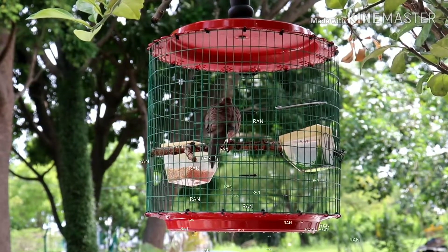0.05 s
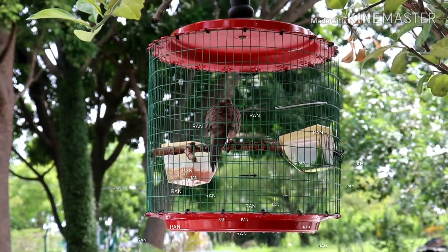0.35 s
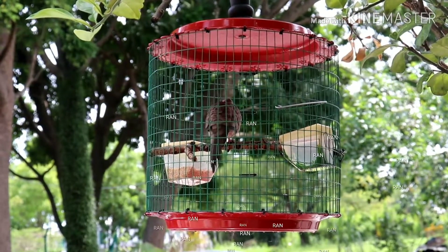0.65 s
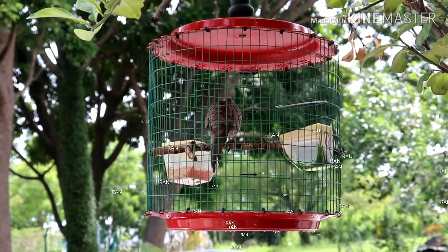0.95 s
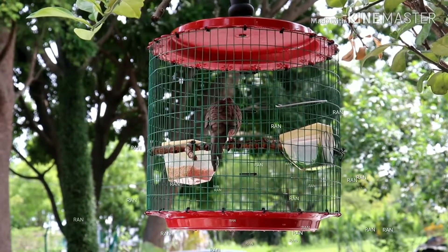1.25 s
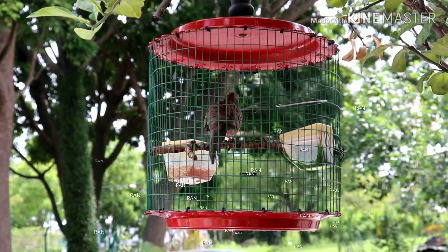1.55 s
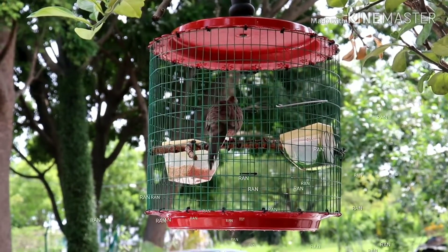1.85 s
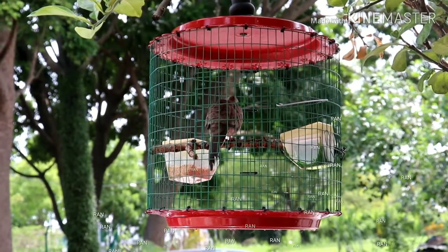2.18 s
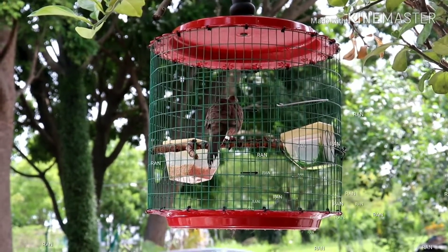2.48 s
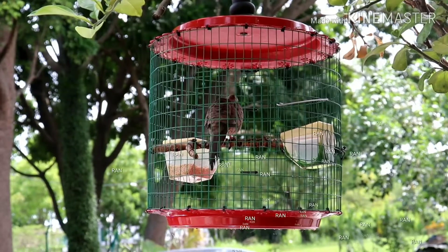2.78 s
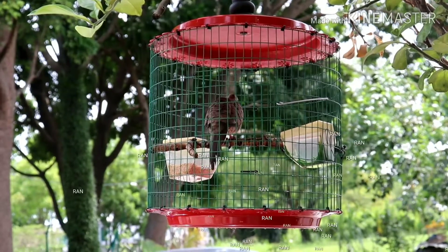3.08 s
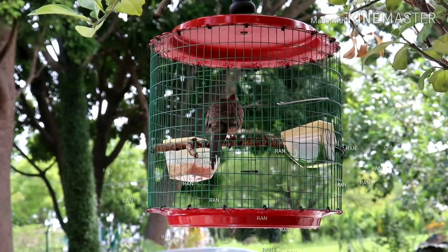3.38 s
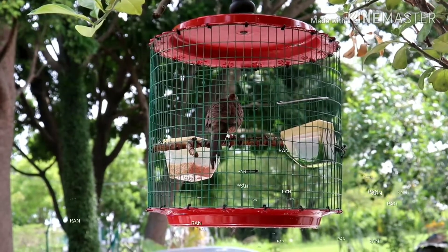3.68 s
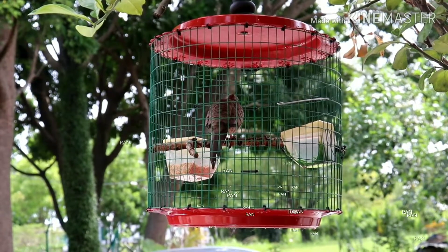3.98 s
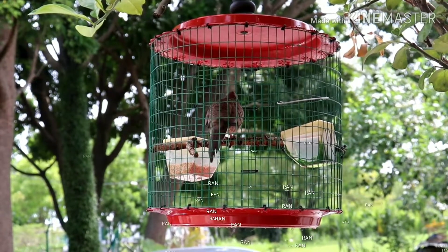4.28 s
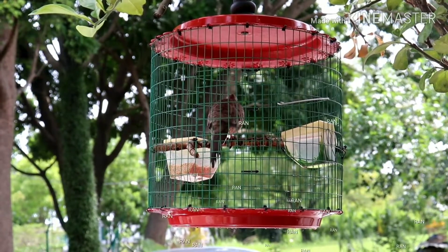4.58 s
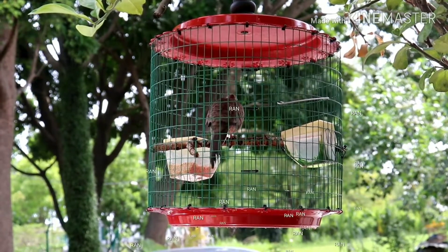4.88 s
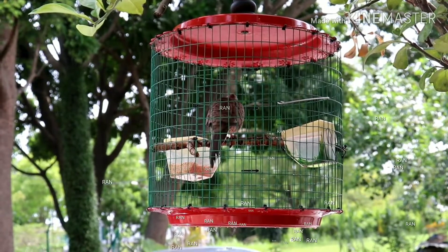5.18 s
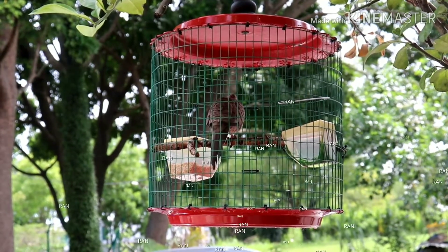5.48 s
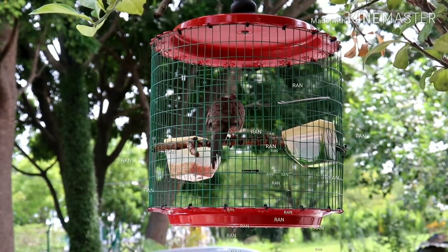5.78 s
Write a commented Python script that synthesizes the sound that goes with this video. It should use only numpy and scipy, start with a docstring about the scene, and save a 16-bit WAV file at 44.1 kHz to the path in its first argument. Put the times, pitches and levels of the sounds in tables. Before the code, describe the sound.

Outdoors among trees, a nearby dove gives a short whoop and three soft, pure coos, repeats the phrase right away, then once more after a pause. Behind it, other birds tweet, whistle, scold and yelp faintly from different sides with a light echo. Something like a broom swishes quietly through leaves throughout, and a low rumble with a faint motor hum lies underneath.

```python
"""A small dove coos three phrases in a hanging cage in a garden. Each is a whoop and three coos:
nearly pure tones whose overtones the throat weakens, interfering with echoes from nearby surfaces.
Farther off, other birds yelp, tweet, scold and whistle in gliding tones scattered by the trees.
Something like a broom swishes through leaves about twice a second over a low, distant rumble."""
import sys
import numpy as np
from scipy import signal
from scipy.fft import rfft, irfft
from scipy.io import wavfile
from scipy.ndimage import uniform_filter1d

SR = 44100
rng = np.random.default_rng(int(sys.argv[2]) if len(sys.argv) > 2 else 0)


def master_out(mix):
    """Clip the mix to full scale and print it as 16-bit PCM to the path in sys.argv[1]."""
    frames = np.transpose(np.atleast_2d(mix))
    ceiling = np.clip(frames, -1, 1)
    pcm = np.round(ceiling * 32767).astype(np.int16)
    wavfile.write(sys.argv[1], SR, pcm)


N = 266805
SLACK_HZ = 715  # the dove's voice scoops up from this pitch


def dove(rasp_db=-47, wet_db=-22):
    """Multipath interference: delayed reflections of each gliding note beat against the direct sound."""
    # opening whoops: (time [s], low part [s], high part [s], high pitch [Hz], pause before flick [s],
    # rise of flick [Hz], level [dB])
    whoops = [(.0605, 0.065, 0.091, 1077, -.003, 51.3, -9), (1.6931, 0.061, .098, 1039, 0.0085, 266, -9),
              (4.4256, .039, .122, 1026, -.003, 258, -8)]
    # three coos a phrase, falling in pitch: (time [s], length [s], pitch [Hz], level [dB])
    coos = [(0.298, 0.04, 974, -11), (0.4102, 0.062, 898, -11), (0.559, 0.13, 869, -12),
            (1.96, 0.041, 951, -9), (2.0716, 0.15, 863.6, -11.5), (2.3267, 0.13, 840.7, -12),
            (4.6682, .0383, 967, -9), (4.778, 0.092, 868.7, -9.5), (4.9603, 0.13, 847.4, -10.5)]
    # direct path, then the nearest surfaces, at each ear: (delay [s], gain [ratio])
    paths_left = [(4e-05, .923), (.00641, .1), (.00891, .17), (.01122, .26), (.03462, .15), (.04279, .14)]
    paths_right = [(0, 1.055), (.01118, .2), (.02378, .115), (.03127, .09), (.03825, .11), (.04646, .15)]
    # reflections from trunks and the line of trees: (delay [s], level [dB])
    far_echoes = [(.068, -28.5), (.115, -26), (.175, -33)]
    voice, overtones = np.zeros(N), np.zeros(N)
    for call in [whoop(*row) for row in whoops] + [coo(*row) for row in coos]:
        for s, parts in call:
            for layer, part in zip((voice, overtones), parts):
                add(layer, s, part)
    overtones *= amp(3.03 * wander(30))
    rasp = amp(rasp_db) * voice * wander(2500)
    voice += overtones + rasp
    ears = np.zeros((2, N))
    for ear, paths in zip(ears, (paths_left, paths_right)):
        for delay, gain in paths:
            add(ear, delay, gain * voice)
        for delay, db in far_echoes:
            add(ear, delay, amp(db) * voice)
    return ears + amp(wet_db) * garden(voice)


def whoop(s, low_s, high_s, high_hz, pause_s, rise_hz, db, low_hz=891.3, overlap_s=0.0056):
    """Register break: a low note leaps to a high, falling one, and an upward flick follows."""
    onset = squeak(s + .003, length=.031, db=-17.5)
    low = note(low_s + overlap_s, low_hz, db - 1.9, attack=0.034, release=0.0077, scoop=low_hz - SLACK_HZ)
    high = note(high_s, high_hz, db, attack=0.0035, release=0.013,
                glide=-108, scoop=86, buzz_db=-4.5, hollow_db=-2.5)
    flick = note(.04, low_hz, db + 1, attack=0.03, release=0.015, glide=rise_hz, hollow_db=-4.5)
    return [onset, (s, low), (s + low_s, high), (s + low_s + high_s + pause_s, flick)]


def coo(s, length, pitch, db, end_hz=758.5):
    """Pitch glide: a nearly pure note scoops up from the slack pitch and sags at the end."""
    onset = squeak(s, length=.018, db=-22)
    tone = note(length, pitch, db, attack=0.021, release=min(0.037, 0.36 * length),
                scoop=pitch - SLACK_HZ, sag=pitch - end_hz)
    return [onset, (s, tone)]


def note(length, pitch, db, attack, release, glide=0, scoop=0, sag=0, buzz_db=3, hollow_db=-1):
    """Source and filter: a buzz turns hollow as the throat fills. Rows: fundamental, overtones."""
    # what the throat passes of the overtones: (frequency [Hz], relative level [dB])
    throat = [(1450, -29), (1700, -43.5), (2100, -34), (2550, -44), (3100, -44), (3450, -47), (4200, -57.5),
              (5100, -53.5), (5600, -52.5), (6050, -42), (6400, -56), (8000, -68)]
    bend_s, buzz_attack_s, buzz_decay_s = .012, 0.0039, 0.03
    tremble_hz, husk_db = 3.9, 2
    t = clock(length)
    bend = scoop * np.exp(-t / bend_s) + sag * np.exp((t - length) / bend_s)
    hz = pitch + glide * (t / length - .5) - bend + tremble_hz * tremble(len(t))
    phase = 2 * np.pi * np.cumsum(hz) / SR
    fill = np.sin(np.pi / 2 * np.minimum(t / attack, 1))
    fade = amp(db) * np.sin(np.pi / 2 * np.minimum((length - t) / release, 1))
    buzz = np.minimum(t / buzz_attack_s, 1) * amp(hollow_db + buzz_db * np.exp(-t / buzz_decay_s))
    overtones = sum(amp(read(throat, k * hz) + husk_db * tremble(len(t))) * np.sin(k * phase)
                    for k in range(2, 9))
    return fade * np.array([fill * np.sin(phase), buzz * overtones])


def squeak(note_s, length, db, from_hz=830, to_hz=1160, rough_hz=90, overlap_s=.004):
    """Onset transient: a rough rising tone swells into the note as the throat opens."""
    count = len(clock(length))
    hz = np.geomspace(from_hz, to_hz, count) + rough_hz * tremble(count)
    tone = whistle(hz, db, fade=0.58) * np.linspace(0, 1, count)
    return note_s + overlap_s - length, [tone]


def tremble(count):
    """Jitter and shimmer: the throat's quick unsteadiness, as smoothed noise of rms near 1."""
    return evened(uniform_filter1d(rng.standard_normal(SR // 2), size=90))[:count]


def yelper(level_db=-39, fade_db_per_s=1.9, hz_per_db=90, echo_s=.032, echo_db=-10):
    """Coupled pitch and level: flat-topped arches, weaker at their low ends, each with a slap echo."""
    # a distant bird's yelps: (time [s], length [s], top pitch [Hz])
    yelps = [(2.763, 0.13, 1373), (2.883, 0.077, 1298), (2.952, 0.042, 1314), (3.023, 0.07, 1290),
             (3.123, 0.053, 1386), (3.229, 0.089, 1385), (3.409, 0.09, 1377), (3.615, 0.12, 1350),
             (3.832, 0.12, 1349), (4.064, .12, 1352), (4.304, .09, 1360), (4.774, 0.11, 1377),
             (4.902, 0.07, 1290), (4.984, 0.064, 1376), (5.105, 0.094, 1350), (5.295, 0.11, 1315)]
    scoop_hz, scoop_s, drop_hz, drop_s = 420, 0.01068, 250, 0.0126
    out = np.zeros(N)
    for s, length, top_hz in yelps:
        t = clock(length)
        below_hz = scoop_hz * np.exp(-t / scoop_s) + drop_hz * np.exp((t - length) / drop_s)
        db = level_db - fade_db_per_s * (s - yelps[0][0]) - below_hz / hz_per_db
        yelp = whistle(top_hz - below_hz, db, fade=0.091)
        add(out, s, yelp)
        add(out, s + echo_s, amp(echo_db) * yelp)
    return placed(out * amp(2.9 * wander(54)), lag_ms=0.088, pan_db=2, wet_db=-8.5)


def tweeter(low_hz=2500, level_db=-44, hollow_db=9, lean_db=4):
    """Frequency sweeps: each tweet is two quick arches of pitch, both weak at the top."""
    # a small bird's tweets: (time [s])
    tweets = [0.378, 0.62, 0.897, 1.18, 1.437, 1.751, 2.095, 2.491, 2.815, 3.314, 3.605, 3.874, 4.182]
    # the syllables of a tweet: (delay [s], length [s], mean arch height [Hz])
    syllables = [(.002, 0.02585, 404.6), (.035, 0.0309, 443)]
    out = np.zeros(N)
    for s in tweets:
        for after, length, arch_hz in syllables:
            progress = np.linspace(0, 1, len(clock(length)))
            arch = np.sin(np.pi * progress) ** 2
            hz = low_hz + arch_hz * arch * (1 + 0.13 * rng.standard_normal())
            db = level_db + hollow_db * (.4 - arch) + lean_db * (progress - .5)
            add(out, s + after, whistle(hz, db, fade=.2))
    return placed(out * amp(4.2 * wander(160)), lag_ms=0.027, pan_db=-3.0, wet_db=-3.0)


def scolder(dip_hz=1930, top_hz=2680, rough_hz=290, rattle_hz=270, flick_db=7):
    """Roughness from fast modulation: a note rattles downward, then clears and swells as it flicks up."""
    # harsh scolding notes: (time [s], level [dB])
    scolds = [(2.366, -37), (2.457, -34.5), (2.546, -35.5), (2.653, -33), (2.955, -33.5), (3.059, -34)]
    out, t = np.zeros(N), clock(.043)
    progress = t / t[-1]
    hz = top_hz - (top_hz - dip_hz) * np.sin(np.pi * progress) ** 2
    flick = np.exp(-((progress - .7) / .17) ** 2)
    rattle = np.sin(2 * np.pi * np.cumsum(rattle_hz * (1 + 0.308 * wander(204.3))) / SR)
    for s, db in scolds:
        rough = rattle[round(s * SR):][:len(t)] * (1 - flick)
        add(out, s, whistle(hz + rough_hz * rough, db + 3 * rough + flick_db * flick, fade=0.43))
    return placed(out, lag_ms=0.21, pan_db=-9.5, wet_db=-4.5)


def whistlers(flutter_db=3.5, twitter_hz=4300, spread_hz=330, count=12):
    """Reverberant blurring: thin warbling slurs fall and level out, more scattered than direct."""
    # whistles and chips high in the trees:
    # (time [s], length [s], start pitch [Hz], end pitch [Hz], warble [Hz], level [dB])
    whistles = [(1.124, 0.018, 3830, 2850, 83, -49), (1.32, 0.03, 3860, 2850, 85, -49),
                (3.019, 0.043, 4230, 4210, 53, -59.5), (3.978, .13, 4630, 3220, 140, -55.5),
                (5.976, 0.1, 4130, 3900, 15, -53)]
    slur_s, fall_hz, warble_hz, slur_db = 0.026, 300, 110, -56
    out, waver = np.zeros(N), np.tanh(wander(120))
    tops = twitter_hz + spread_hz * rng.uniform(-0.7, 1, count)
    times = np.linspace(0.94, 1.35, count)
    twitter = [(s, slur_s, hz, hz - fall_hz, warble_hz, slur_db) for s, hz in zip(times, tops)]
    for s, length, start_hz, end_hz, warble, db in whistles + twitter:
        t = clock(length)
        hz = end_hz + (start_hz - end_hz) * (1 - t / t[-1]) ** 1.6
        hz += warble * np.roll(waver, -round(s * SR))[:len(t)]
        add(out, s, whistle(hz, db))
    return placed(out * amp(flutter_db * wander(90)), lag_ms=0, pan_db=5, wet_db=4)


def sweeping(decay_s=.083, grain_db=2.0, clump_db=1.14):
    """Incoherent addition: strokes set off uneven clouds of leaf crackles, whose powers sum."""
    # strokes through leaves: (peak time [s], rise [s], level [dB])
    swishes = [(.597, 0.019, -47.5), (1.067, 0.017, -47.5), (1.509, 0.017, -51), (1.965, 0.0084, -44),
               (2.2, .014, -50), (2.435, .018, -48.5), (2.746, .024, -46), (3.195, .03, -46.5),
               (3.622, 0.026, -47), (4.225, 0.053, -47), (4.697, 0.0043, -42), (4.97, 0.021, -48.5),
               (5.37, 0.043, -46.8), (5.885, .042, -49)]
    # spectrum of the crackle: (frequency [Hz], relative level [dB])
    leaf_spectrum = [(500, -15.5), (1500, -8.5), (3000, -0.5), (4700, 0.5), (6500, -2), (8300, -2.5),
                     (10500, -9), (13000, -13.5), (15500, -18)]
    t, power = np.arange(N) / SR, np.zeros(N)
    for s, rise, db in swishes:
        before, after = np.minimum(t - s, 0), np.maximum(t - s, 0)
        power += amp(db) ** 2 * np.exp(-(before / rise) ** 2 - 2 * after / decay_s)
    crackle = rng.standard_normal((2, N)) * amp(grain_db * wander(600) + clump_db * wander(50))
    return np.sqrt(power) * coloured(crackle, leaf_spectrum)


def air(wash_db=-42, rumble_hz=500, hum_hz=245, sizzle_hz=9800, sizzle_db=-69):
    """Diffuse field: noise coherent between the ears in the bass, plus a hum and an insect-like sizzle."""
    # the outdoor wash: (frequency [Hz], relative spectral density [dB])
    wash_spectrum = [(20, -12.5), (38, -9), (60, -1.5), (78, -4.5), (102, 1), (160, -3.5), (300, -8),
                     (800, -10), (1300, -14), (2500, -20.5), (4300, -23), (5100, -29.5), (9900, -31),
                     (15500, -47.5)]
    # likeness of the two ears: (frequency [Hz], correlation [ratio])
    coherence = [(60, 0.99), (170, .95), (350, 0.84), (700, 0.65), (1400, 0.044), (2800, 0.042),
                 (10000, 0.044)]
    # a far motor's hum: (time [s], level [dB])
    motor_levels = [(0, -51), (.4, -48), (1.1, -46.5), (2, -54), (4.1, -55), (4.7, -60.5), (6.05, -52.5)]
    swell_s, swell_width_s, swell_db = 2.22, 0.2, 5.5  # the distant rumble swells once
    t, hz = np.arange(N) / SR, np.fft.rfftfreq(N, 1 / SR)
    left, independent = rfft(rng.standard_normal((2, N)))
    alike = np.clip(read(coherence, hz), -1, 1)
    right = alike * left + np.sqrt(1 - alike ** 2) * independent
    wash = amp(wash_db) * coloured(irfft([left, right], N), wash_spectrum)
    rumble = irfft(rfft(wash) / (1 + (hz / rumble_hz) ** 4), N)
    hiss = (wash - rumble) * amp(.5 * wander(10))
    rumble *= amp(swell_db * np.exp(-((t - swell_s) / swell_width_s) ** 2) + .9 * wander(14))
    hum_db = np.interp(t, *np.transpose(motor_levels)) + 2 * wander(11)
    hum = amp(hum_db) * np.sin(2 * np.pi * np.cumsum(hum_hz + 4 * wander(7.2)) / SR)
    sizzle = np.array([wander(450), wander(450)]) * np.sin(2 * np.pi * sizzle_hz * t)
    return hiss + rumble + hum + amp(sizzle_db) * sizzle


def placed(x, lag_ms, pan_db, wet_db):
    """Interaural time and level differences give a far source its direction; scattering adds distance."""
    t = np.arange(N) / SR
    left = np.interp(t - lag_ms / 1000, t, x)
    return np.array([left * amp(pan_db / 2), x * amp(-pan_db / 2)]) + amp(wet_db) * garden(x)


def garden(x):
    """Scattering from trunks and leaves: sparse reflections, each band decaying at its own rate."""
    # reverberation among the trees: (frequency [Hz], time to fall 60 dB [s])
    decay_times = [(300, 0.29), (900, 0.78), (1400, 0.65), (2500, 0.63), (8000, 0.28)]
    taps = rng.standard_normal((2, SR)) * (rng.random((2, SR)) < .05)
    hz, t, bands = signal.stft(taps, SR, nperseg=256)
    decay = amp(-60 * t / read(decay_times, hz)[:, None])
    early = np.minimum(t / .008, 1) * (1 + np.exp(-t / .02))  # near leaves scatter strongly at first
    tail = signal.istft(bands * decay * early, SR, nperseg=256)[1]
    return signal.fftconvolve(x[None], tail / np.linalg.norm(tail[0]), axes=1)[:, :N]


def whistle(hz, db, fade=0.16):
    """A pure tone with tapered ends; its phase is the integral of its frequency."""
    return amp(db) * signal.windows.tukey(len(hz), fade) * np.sin(2 * np.pi * np.cumsum(hz) / SR)


def wander(rate_hz):
    """Random modulation: noise of rms 1, low-passed at the given rate."""
    lowpass = np.exp(-(np.fft.rfftfreq(N, 1 / SR) / rate_hz) ** 2)
    return evened(irfft(rfft(rng.standard_normal(N)) * lowpass, N))


def coloured(x, points):
    """Spectral shaping by a table of levels, at rms 1."""
    return evened(irfft(rfft(x) * amp(read(points, np.fft.rfftfreq(N, 1 / SR))), N))


def read(points, hz):
    """Interpolation on a log-frequency axis."""
    f, value = np.transpose(points)
    return np.interp(np.log(hz + 1), np.log(f + 1), value)


def amp(db):
    """Decibels to amplitude ratio."""
    return 10 ** (np.asarray(db) / 20)


def evened(x):
    """Normalisation to rms 1."""
    return x / np.sqrt(np.mean(x ** 2) + 1e-20)


def add(mix, s, sound):
    """Superposes a sound on the mix at time s."""
    part = mix[max(round(s * SR), 0):][:len(sound)]
    part += sound[:len(part)]


def clock(length):
    """Sample times of a note."""
    return np.arange(max(int(length * SR), 8)) / SR


def scene():
    """Superposition: the dove in front, the garden behind."""
    return dove() + yelper() + tweeter() + scolder() + whistlers() + sweeping() + air()


def record(dry, edge_hz=15500):
    """Band limiting: a linear-phase low-pass removes the highest treble."""
    lowpass = signal.firwin(511, edge_hz, window=("kaiser", 9), fs=SR)
    return signal.oaconvolve(dry, lowpass[None], "same")


dry = scene()
out = record(dry)
master_out(out)
```